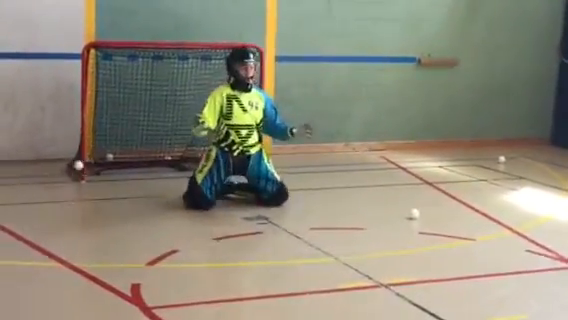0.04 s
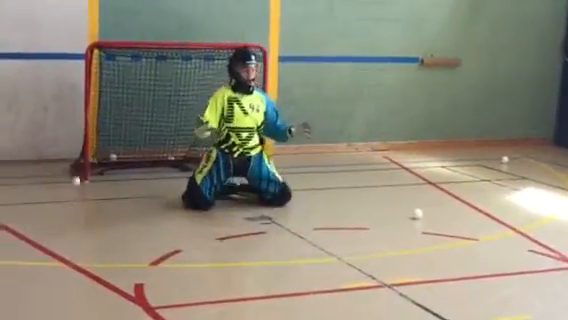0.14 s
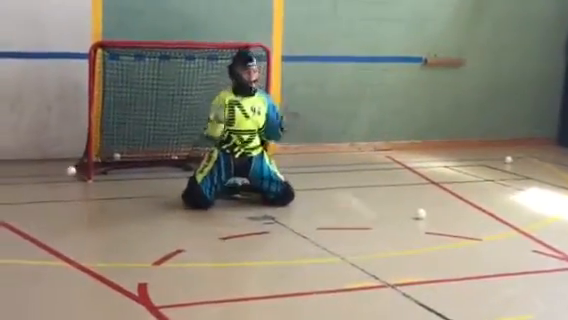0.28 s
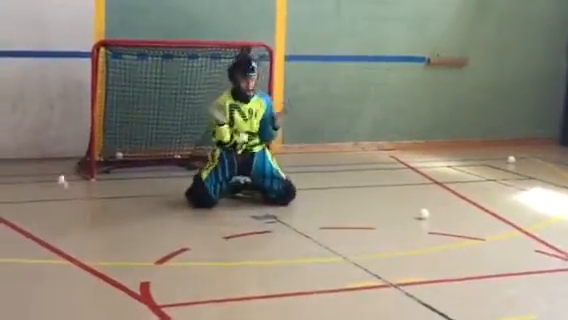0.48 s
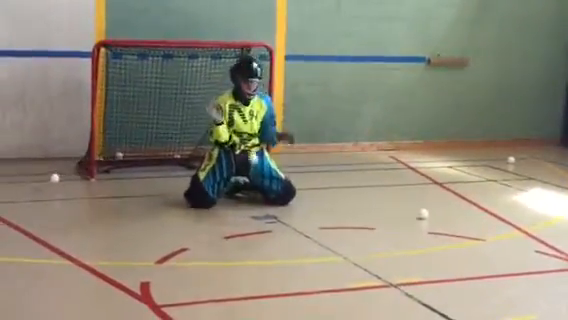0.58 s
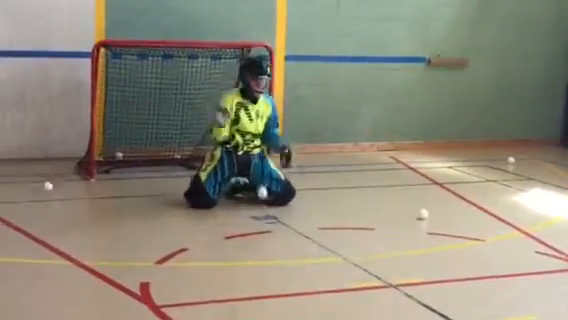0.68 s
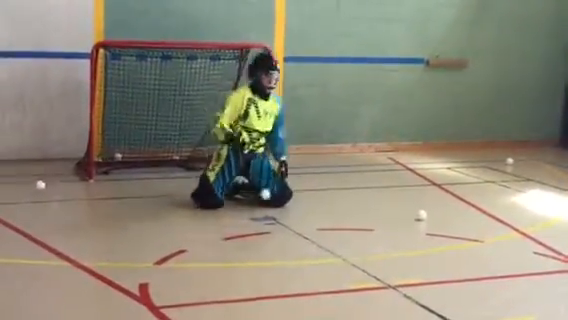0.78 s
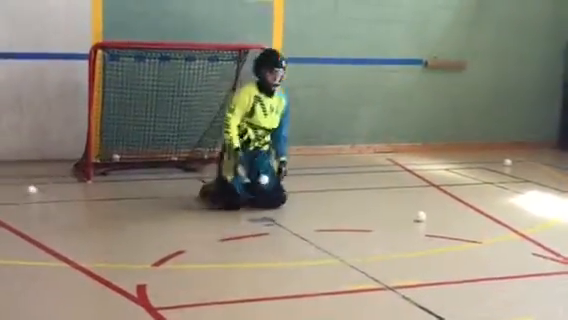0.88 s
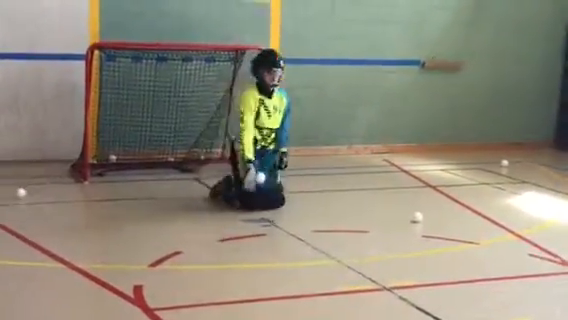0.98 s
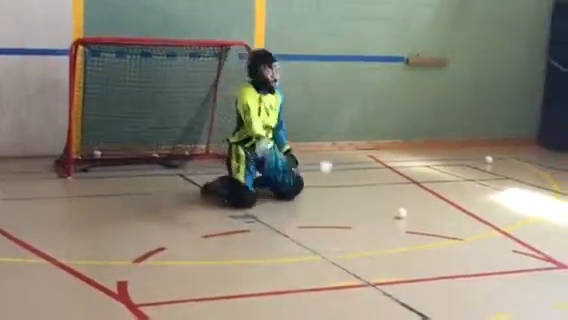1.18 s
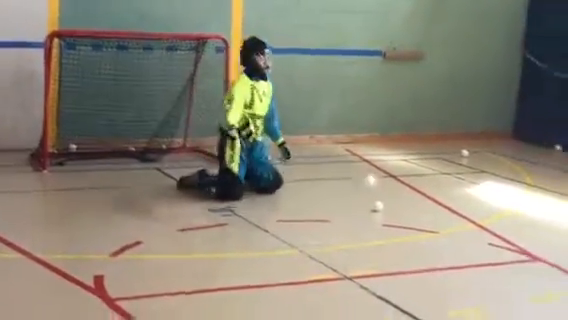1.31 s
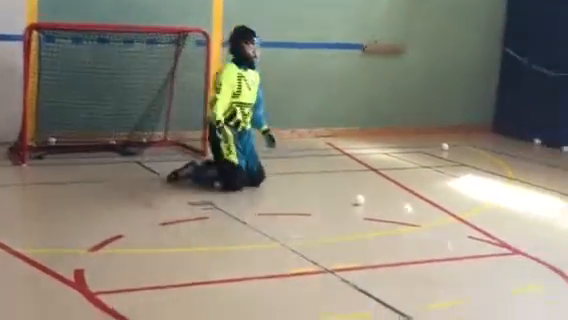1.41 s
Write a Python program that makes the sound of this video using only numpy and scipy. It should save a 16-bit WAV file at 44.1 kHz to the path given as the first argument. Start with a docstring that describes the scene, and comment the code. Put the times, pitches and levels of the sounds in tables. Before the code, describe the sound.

A floorball stick slaps the floor and cracks against a hollow ball, echoing through a large sports hall; the ball thuds into a kneeling goalkeeper's padding, then light clicks, knee bumps and cloth swishes follow, slightly distant microphone.

```python
"""A low ventilation rumble with a faint swish and light knock, then a floorball shot in a large sports hall:
the blade slaps the sprung floor and cracks against the hollow ball, as filtered bursts and damped modes.
Smeared copies and decaying noise give the walls' echoes and the hall's ring. The ball knocks hollowly against a
kneeling goalkeeper, as damped swings with puffs, and drops with short clicks and a shell's ring; the keeper's
knees bump in slow, deep swings and the suit swishes over the floor as shaped noise."""
import sys
import numpy as np
from scipy import signal
from scipy.fft import rfft, irfft, next_fast_len
from scipy.io import wavfile
from scipy.ndimage import uniform_filter1d

SR = 44100
rng = np.random.default_rng(int(sys.argv[2]) if len(sys.argv) > 2 else 0)


def wav_out(sig):
    """Save sig, one row per channel (or a flat mono array), as 16-bit PCM at SR to the path in sys.argv[1]."""
    wavfile.write(sys.argv[1], SR, np.round(np.clip(np.atleast_2d(sig).T, -1, 1) * 32767).astype(np.int16))


N = 63945

SLAP_S, CRACK_S = 0.2378, 0.2633  # blade meets floor, then ball (seconds)
# Colour of the hall's answer to taps and thuds. Each row: frequency in Hz, gain in dB.
HALL_COLOUR = [(60, 1.5), (200, 0), (600, 0), (2000, -7), (6000, -2), (16000, 1)]


def amp(db):
    """Level definition: 20 dB is a factor of ten in amplitude."""
    return 10 ** (np.asarray(db) / 20)


def unit(x):
    """Normalisation to a root-mean-square value of one."""
    return x / np.sqrt(np.mean(x ** 2) + 1e-20)


def clock():
    """Uniform sampling: the time of each sample in seconds."""
    return np.arange(N) / SR


def along(points, hz):
    """Interpolation of (Hz, value) points on a logarithmic frequency axis."""
    f, v = np.transpose(points)
    return np.interp(np.log(hz + 1), np.log(f + 1), v)


def coloured(x, gain):
    """Minimum-phase filtering: a folded cepstrum makes the given gain over frequency causal."""
    m = 2 * next_fast_len(N)
    log_gain = np.log(np.maximum(gain(np.fft.rfftfreq(m, 1 / SR)), 1e-6))
    cepstrum = irfft(log_gain, m)
    cepstrum[1:m // 2] *= 2
    cepstrum[m // 2 + 1:] = 0
    response = np.exp(rfft(cepstrum))
    return irfft(rfft(x, m) * response, m)[:N]


def shape(points):
    """Spectral envelope: gain as a function of frequency from (Hz, dB) points."""
    return lambda hz: amp(along(points, hz))


def at(s, x):
    """Pure delay of x by s seconds."""
    return np.pad(x, (max(round(s * SR), 0), 0))[:N]


def burst(t60, gain):
    """Broadband impact: dying noise with flattened spectrum, then coloured to energy 1; t60 is nominal."""
    fade = amp(-60 * clock() / t60)
    spectrum = rfft(rng.standard_normal(N) * fade)
    even = irfft(spectrum / (abs(spectrum) + 1e-12), N)
    x = coloured(even * np.sqrt(fade), gain)
    return x / np.linalg.norm(x)


def ring(hz, t60, rise_s):
    """Damped resonance: one mode with exponential rise and decay."""
    t = clock()
    return np.sin(2 * np.pi * hz * t) * amp(-60 * t / t60) * (1 - np.exp(-t / rise_s))


def modes(table):
    """Modal superposition: an object's modes, struck together."""
    return sum(amp(db) * ring(hz, t60, rise_s=0.0004) for hz, db, t60 in table)


def dying(noise, share):
    """Frequency-dependent absorption: each band of noise dies in a share of the hall's decay time."""
    # Reverberation before scaling by share. Each row: frequency in Hz, decay by 60 dB in seconds.
    hall_decay = [(70, 1.2), (250, 1), (650, 1.47), (2000, 1.77), (3200, 1.26), (5500, 0.82), (8500, .5),
                  (11400, 0.45), (15000, 0.3)]
    hz, t, z = signal.stft(unit(noise), SR, nperseg=256)
    decay_s = share * along(hall_decay, hz)[:, None]
    return signal.istft(z * amp(-60 * t / decay_s), SR, nperseg=256)[1][:N]


def hall(x, colour):
    """Reverberation as convolution: grainy early reflections and a long tail, highest treble dying fastest."""
    delay_s, rise_s = 0.0065, 0.0093
    early_db, early_share, tail_share = 1, 0.19, 0.88  # shares of the hall's decay time
    grain = 0.64  # the higher, the more single reflections stand out
    smooth, scatter = rng.standard_normal((2, N))
    early = dying(np.sign(scatter) * abs(scatter) ** grain, early_share)
    reflections = dying(smooth, tail_share) + amp(early_db) * early
    answer = coloured(reflections * (1 - np.exp(-clock() / rise_s)), shape(colour))
    return at(delay_s, signal.fftconvolve(x, answer / np.linalg.norm(answer))[:N])


def air():
    """Stationary random noise: the hall's steady ventilation rumble, strongest in the bass."""
    # Colour of the rumble. Each row: frequency in Hz, gain in dB.
    air_colour = [(20, -8), (45, -9), (75, -3.5), (150, 0), (230, -2.5), (340, -13), (500, -12), (650, -5),
                  (880, -24.5), (2100, -21), (3200, -27.5), (5500, -32), (9000, -38), (16000, -41.5)]
    level_db = -50
    return amp(level_db) * unit(coloured(rng.standard_normal(N), shape(air_colour)))


def swish(rough_db=1.0):
    """Friction noise: cloth slides on the floor with a fine, uneven grain."""
    # Course of the sliding before the grain. Each row: time in seconds, level in dB.
    slide_course = [(0, -60.5), (.06, -60.5), (.13, -54), (0.169, -65), (.55, -70), (0.652, -43.5),
                    (.70, -60.5), (.77, -76.5), (0.874, -43), (.93, -53), (1.069, -54), (1.14, -48.5),
                    (1.21, -49.5), (1.30, -57.5), (1.37, -68), (1.45, -62)]
    # Colour of the cloth. Each row: frequency in Hz, gain in dB.
    cloth_colour = [(200, 4.5), (800, -0.5), (1600, 7), (2400, -4), (3500, 0.5), (5500, -7.5),
                    (8600, -10.5), (14000, -19), (16500, -28)]
    level_db = np.interp(clock(), *np.transpose(slide_course))
    grain_db = rough_db * unit(uniform_filter1d(rng.standard_normal(N), size=150))
    rubbing = unit(coloured(rng.standard_normal(N), shape(cloth_colour)))
    return amp(level_db + grain_db) * rubbing


def bumps():
    """Low-frequency resonance: the sprung floor answers the keeper's knees with slow, deep swings."""
    # Swells under the keeper's shifting weight. Each row: start in seconds, level in dB, pitch in Hz.
    floor_swells = [(0.614, -31, 70.6), (0.674, -30.5, 60.4), (.860, -37, 79.5), (0.941, -43, 89),
                    (1.090, -40, 78.2)]
    return sum(amp(db) * at(s, ring(hz, t60=0.2, rise_s=0.0067)) for s, db, hz in floor_swells)


def thuds():
    """Damped impact: padded blows swing low with a dull puff; the hall answers the broad puff."""
    # Ball on the suit, knees and hands on the floor.
    # Each row: start in seconds, level in dB, pitch in Hz, decay time in seconds (nominal for the puff).
    padded_blows = [(0.4963, -15, 1384, 0.019), (0.4993, -11.5, 248, 0.016), (0.5, -18.5, 629, 0.038),
                    (0.5092, -9, 428, 0.0091), (0.5215, -13.5, 466, 0.017), (.5370, -20, 209, 0.043),
                    (.5480, -24, 592, 0.019), (.5875, -28, 356, 0.042), (.6040, -32.5, 500, 0.16),
                    (.8400, -24, 940, 0.02), (.8540, -19.5, 570, .012), (0.859, -28.5, 146.8, .1),
                    (0.876, -31.5, 173.7, 0.13), (.8800, -30, 636, 0.1), (1.347, -38.5, 870, 0.019),
                    (1.349, -44.5, 159, .05), (1.423, -41, 146, 0.071)]
    puff_share, hall_db = 0.65, -6.5
    swings, puffs = np.zeros((2, N))
    for s, db, pitch_hz, t60 in padded_blows:
        swing = amp(db) * ring(pitch_hz, t60, rise_s=0.00092)
        puff = burst(t60, lambda hz: (hz / pitch_hz) ** 2 / (1 + (hz / pitch_hz) ** 4))
        swings += at(s, swing)
        puffs += at(s, np.linalg.norm(swing) * puff)  # as much energy as the swing
    return swings + puff_share * puffs + amp(hall_db) * hall(puffs, HALL_COLOUR)


def taps():
    """Brief broadband impacts: clicks of ball and keeper's gear, each a broad hump of frequencies."""
    # Light plastic taps and ticks.
    # Each row: start in seconds, level in dB, centre in Hz, nominal decay time in seconds.
    plastic_ticks = [(0.0822, -18, 2200, 0.037), (0.122, -32, 2980, .04), (0.4976, -23, 1990, 0.028),
                     (.4990, -9.5, 1984, 0.012), (.5180, -20.5, 6000, .012), (0.578, -28, 6953, .01),
                     (.5850, -20, 2500, .012), (0.6096, -24.5, 3023, .006), (0.8092, -30.5, 10090, .005),
                     (0.8401, -14.5, 2350, 0.017), (0.854, -22.5, 10000, 0.0065), (0.8746, -25, 7000, .02),
                     (0.9822, -31, 8890, .01), (1.136, -28, 1980, .03), (1.346, -35.5, 1183, .012)]
    skirt, hall_db = 1.55, -11.5  # exponent of the hump's flanks; level sent to the hall

    def hump(centre):
        return lambda hz: ((hz + 1) / centre + centre / (hz + 1)) ** -skirt

    x = sum(at(s, amp(db) * burst(t60, hump(hz))) for s, db, hz, t60 in plastic_ticks)
    return x + amp(hall_db) * hall(x, HALL_COLOUR)


def knocks():
    """Shell resonance: each light knock on the floor rings the hollow ball's modes."""
    # Knocks of the ball. Each row: start in seconds, level in dB.
    ball_knocks = [(0.083, -36), (0.8389, -34)]
    # Modes of the ball. Each row: frequency in Hz, level in dB, decay time in seconds.
    ball_modes = [(1482, -7, 0.055), (2372, -2, 0.042), (3370, -11, 0.048)]
    return sum(amp(db) * at(s, modes(ball_modes)) for s, db in ball_knocks)


def shot_echo():
    """Reflection and reverberation: smeared, duller copies return and both contacts set the hall ringing."""
    # Colour of the shot as it spreads through the hall. Each row: frequency in Hz, gain in dB.
    spread_colour = [(35, -33), (65, 4.5), (130, 1), (220, 1.5), (350, 1), (490, -6.5), (660, 2),
                     (1150, -3), (1600, -0.5), (2100, 0.5), (2700, -6.5), (4100, -4), (5200, -8),
                     (8600, -6), (11400, -10.5), (15500, -13)]
    # Echoes from floor and walls.
    # Each row: start in seconds, level in dB, nominal decay time in seconds, treble edge in Hz.
    wall_echoes = [(0.242, 1.5, 0.013, 7000), (0.2495, 2, 0.067, 2500), (0.2658, 4.5, 0.014, 16000),
                   (0.2801, 5, .022, 5000), (.2920, 2.5, .03, 7000), (0.3044, 4, 0.011, 9960),
                   (0.3153, -2.5, 0.035, 7960), (.3470, -1, 0.044, 3500)]
    slap_hall_db, crack_hall_db = 1, 11

    def dulled(edge):
        return lambda hz: shape(spread_colour)(hz) / np.hypot(1, hz / edge)

    copies = sum(at(s, amp(db) * burst(t60, dulled(edge_hz))) for s, db, t60, edge_hz in wall_echoes)
    pulse = signal.unit_impulse(N)
    contacts = at(SLAP_S, amp(slap_hall_db) * pulse) + at(CRACK_S, amp(crack_hall_db) * pulse)
    return copies + hall(contacts, spread_colour)


def shot():
    """Impact excitation: the blade slaps the floor, which booms, and then cracks against the ball."""
    # Colours of the two contacts. Each row: frequency in Hz, gain in dB.
    slap_colour = [(40, -14.5), (120, -5.5), (400, -1.5), (900, 2.5), (1800, 1.5), (2500, -4.5),
                   (3200, -0.5), (4700, -20), (6500, -1), (13000, -8.5), (16500, -12)]
    crack_colour = [(40, -25.5), (200, -12), (500, 8), (1200, -4), (2600, 4), (4200, -3), (5000, 10.5),
                    (5500, 16.5), (6300, 3), (10000, 9), (14000, 3), (16500, 5.5)]
    # Modes of stick and floor. Each row: frequency in Hz, level in dB, decay time in seconds.
    blade_modes = [(198, -23, 0.06), (397, -19.5, 0.031), (616, -7.5, 0.037), (665.3, -22.5, 0.29),
                   (944, -19.5, 0.052), (1093, -17.5, 0.04), (1368, -12.5, 0.028), (2020, -32, 0.023)]
    slap_db, crack_db, boom_db = 18, 13, -16
    slap = at(SLAP_S, amp(slap_db) * burst(0.0055, shape(slap_colour)) + modes(blade_modes))
    crack = at(CRACK_S, amp(crack_db) * burst(0.014, shape(crack_colour)))
    boom = at(SLAP_S + 0.0043, amp(boom_db) * ring(hz=74.6, t60=0.21, rise_s=0.009))
    return slap + crack + boom


def scene():
    """Linear superposition of the hall's rumble, the keeper, the ball and the shot, in one channel."""
    background = air() + swish()
    save = bumps() + thuds() + taps() + knocks()
    return (background + save + shot_echo() + shot())[None]


def record(dry):
    """Saturation and band limiting: the microphone rounds off peaks and weakens deep bass and top treble."""
    ceiling, low_cut_hz, top_hz = 0.62, 54, 16000
    x = dry / (1 + abs(dry / ceiling) ** 6) ** (1 / 6)
    x = signal.sosfilt(signal.butter(2, low_cut_hz, "high", fs=SR, output="sos"), x)
    return signal.sosfilt(signal.ellip(10, .1, 90, top_hz, fs=SR, output="sos"), x)


dry = scene()
out = record(dry)
wav_out(out)
```